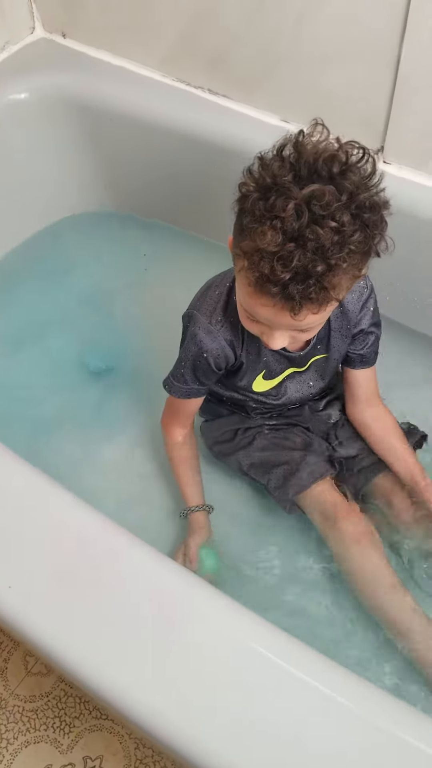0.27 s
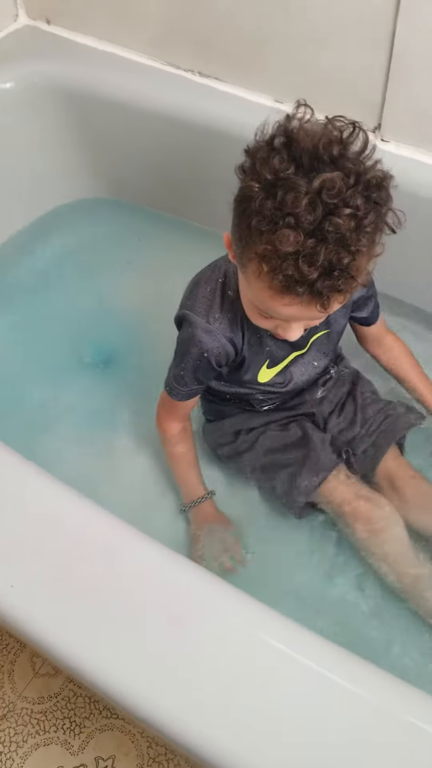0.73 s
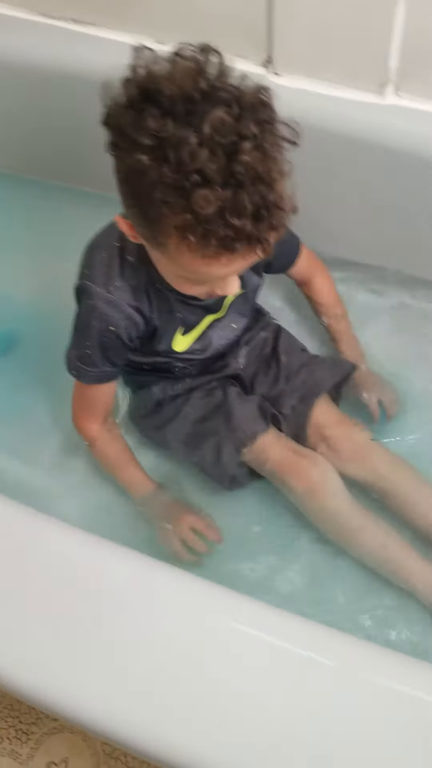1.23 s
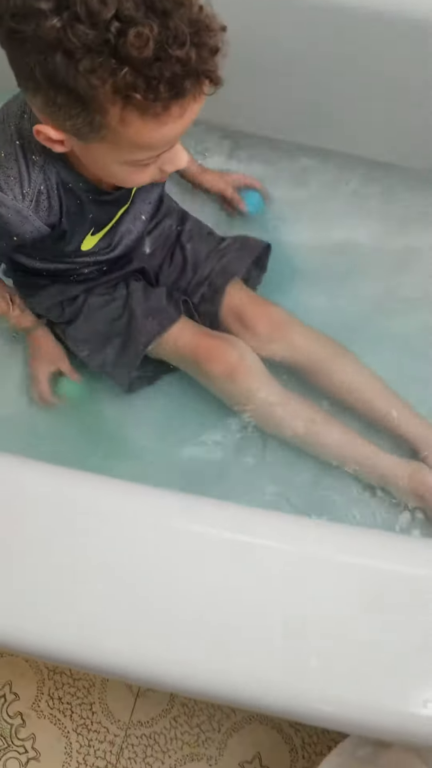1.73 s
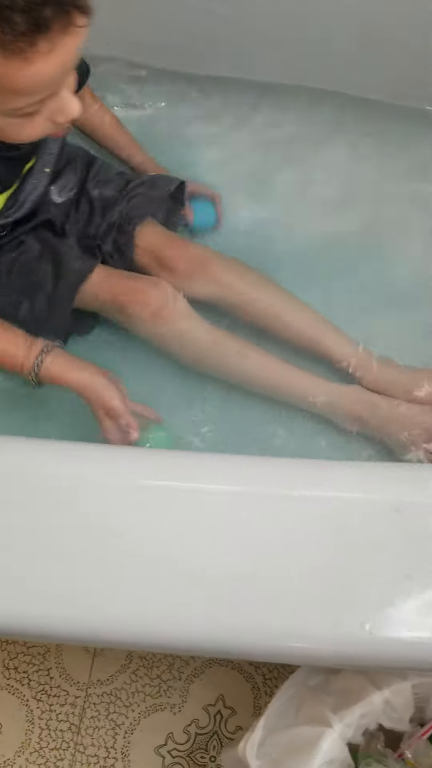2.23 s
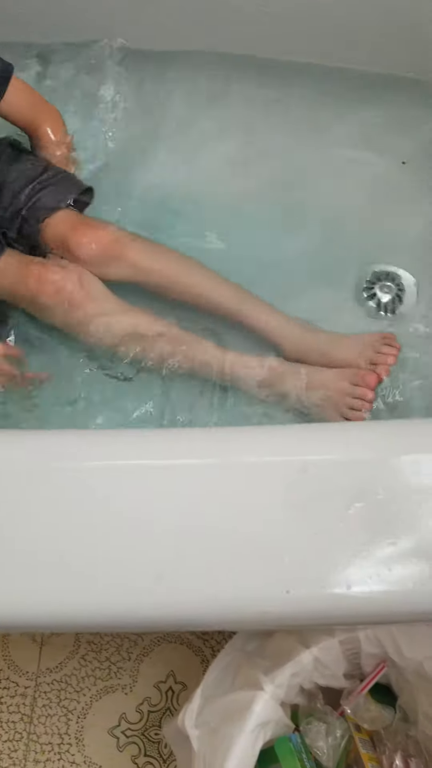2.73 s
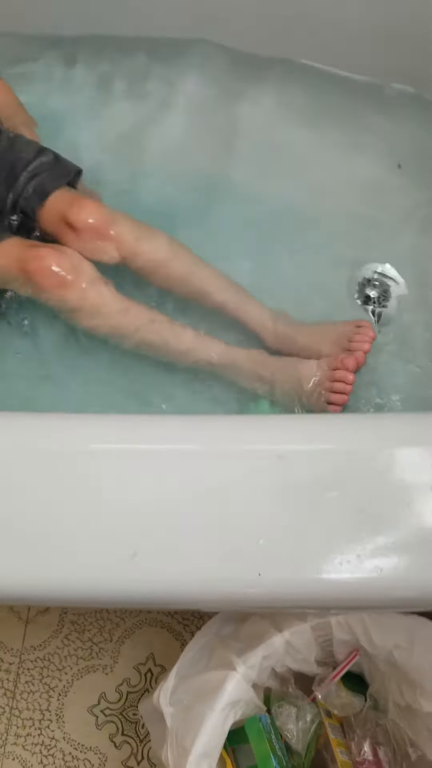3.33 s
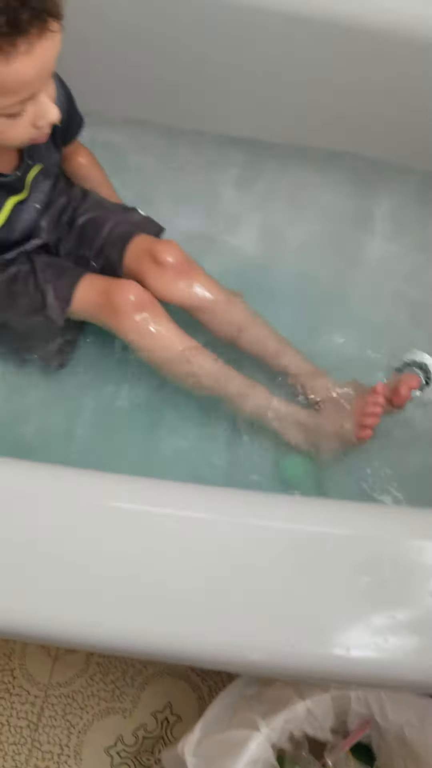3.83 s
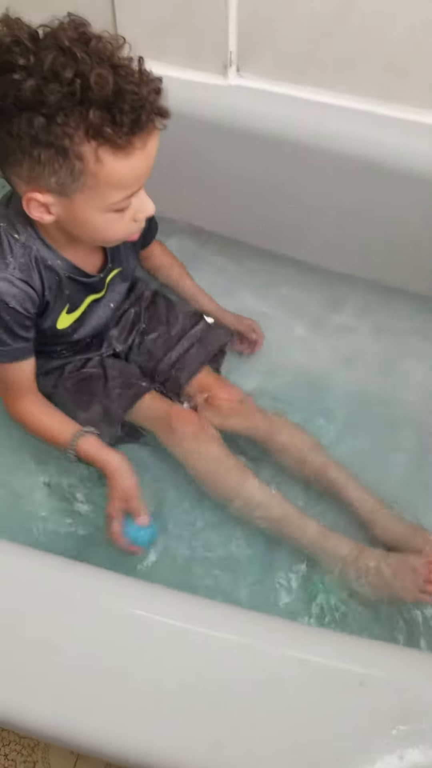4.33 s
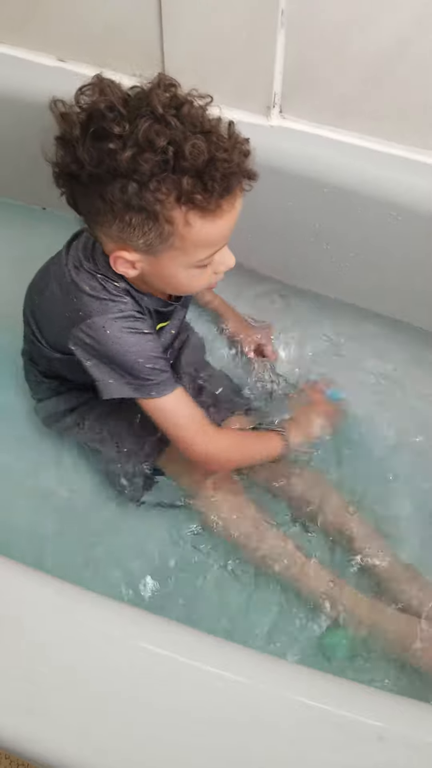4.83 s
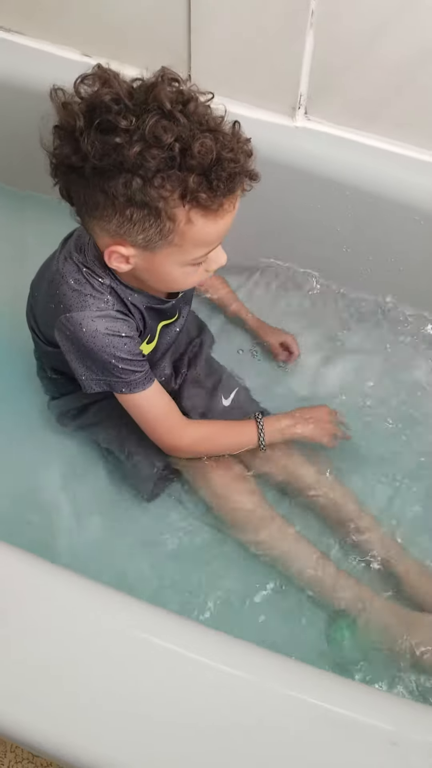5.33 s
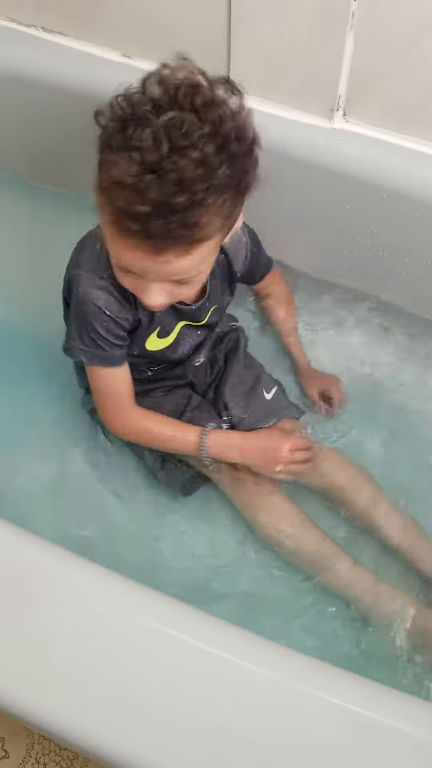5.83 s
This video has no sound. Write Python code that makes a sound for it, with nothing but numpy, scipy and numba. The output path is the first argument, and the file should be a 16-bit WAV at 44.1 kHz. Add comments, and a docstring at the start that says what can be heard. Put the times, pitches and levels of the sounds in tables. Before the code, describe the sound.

Bathwater laps softly throughout as a child moves hands and legs in the tub. It is heard from close above the rim, with a short echo from the tiled bathroom and a steady low household hum behind it. For the first 2 seconds there are light strokes and a few small bubbly plips, with a gentle slosh just before 1 second. From about 2.2 to 3 seconds a brisker stir sends drops slapping onto the surface with a bright spatter. Between 3 and 4 seconds the water calms to quiet lapping and an odd drip. The loudest part runs from about 4.2 to 5 seconds: a quick flurry of splashes and spray, with small bubbles churning between the slaps. This thins to trickling, and one last short splash comes at about 5.8 seconds before the water laps on briefly.

```python
"""Someone in a bathtub stirs the water with hands and legs; a phone is held above the rim.
Lapping and a low household hum run throughout; the tiled bathroom echoes the water.
0-2 s: light strokes, trapped bubbles ring for a few cycles. 2-3 s: a brisker stir, drops slap the surface.
3-4 s: lull. 4.2-5 s: loudest splashing, small bubbles churn between the slaps.
Then trickling, and a last splash at 5.8 s."""
import sys
import numpy as np
from scipy import signal
from scipy.fft import rfft, irfft, next_fast_len
from scipy.io import wavfile
from numba import njit

SR = 44100
rng = np.random.default_rng(int(sys.argv[2]) if len(sys.argv) > 2 else 0)


def unload_audio(sound):
    """Save the sound as a 16-bit wav file, at the path given as the first command line argument."""
    columns = np.transpose(np.atleast_2d(sound))
    # keep every value between -1 and 1, then stretch to whole-number steps
    steps = np.round(np.clip(columns, -1, 1) * 32767)
    wavfile.write(sys.argv[1], SR, steps.astype(np.int16))


N = 268657
SPOTS = 6  # places in the tub, each with its own echoes


def bubbles(rise_cycles=0.29, snap=0.76, max_glide=0.032):
    """Single bubbles pinch off, ring and creep up in pitch. Returns (room feed, direct feed)."""
    # (time [s], pitch [Hz], level [dB], decay to 1/e [cycles], direct path offset [dB])
    events = [(0.002, 3360, -38.5, 3.7, -7), (0.003, 4450, -35, 2.6, 2), (0.096, 3160, -46.5, 8, 4),
              (0.1511, 2930, -45, 6.9, 3), (0.731, 2780, -43.5, 3.4, 0), (0.7315, 850, -36.5, 2.8, 3.5),
              (0.8022, 690, -51, 5, 4), (0.8564, 424, -48, 3.1, -11), (0.87, 794, -32, 1, -2),
              (0.8705, 1520, -35, 1.2, 3), (0.872, 148, -43.5, 7.3, 4), (0.89, 219, -48, 3.1, 4),
              (0.9653, 6150, -44, 5.1, 0), (0.9675, 2300, -50, 2.6, 2), (0.9723, 550, -40.5, 4.1, -2),
              (1.02, 114, -42, 5.4, 4), (1.602, 5000, -47, 4, -1), (1.966, 4500, -48.5, 2.6, -6),
              (2.1657, 3100, -51.5, 6, 1), (2.1817, 5960, -49.5, 5.7, 7), (2.1835, 2450, -42, 3.4, 2),
              (2.2268, 2260, -43, 6.9, 4), (2.2275, 920, -43, 3.2, -11), (2.2295, 4450, -46, 7.9, 7),
              (2.235, 118, -40, 4.8, -3), (2.2521, 233, -40.5, 3.7, 2), (2.2553, 5300, -42, 6, 0),
              (2.2559, 490, -52.5, 3, 5), (2.2799, 2500, -47, 5.5, 1), (2.2873, 5820, -22.5, 6.9, -4.5),
              (2.313, 1225, -39.5, 11.6, 5), (2.3343, 1890, -39, 2.9, -3), (2.3823, 796, -47.5, 2.8, 3),
              (2.4315, 1970, -50.5, 4, 2), (2.4445, 2400, -51, 4.3, -1), (2.4672, 3000, -37, 3.2, 3),
              (2.4947, 3730, -31.5, 3.6, 2), (2.5017, 2260, -38, 3.8, 3.5), (2.587, 2180, -42.5, 4.1, 7.5),
              (2.6908, 1370, -35.5, 3.5, -2), (2.6897, 1291, -44, 16, -12), (2.803, 308, -51.5, 9.4, 3.5),
              (2.808, 618, -49.5, 9.9, -13), (2.839, 910, -53.5, 4.8, 0), (3.042, 3680, -36, 4.9, -3.5),
              (3.1256, 2460, -48.5, 5.9, -12), (3.4682, 4120, -50.5, 7.3, -4), (4.17, 1440, -52, 3.5, -7),
              (4.173, 5460, -54, 5, 4), (4.205, 1710, -44, 4.4, 0), (4.2294, 6560, -33.5, 5.7, -10),
              (4.2434, 3100, -31, 2.1, 2), (4.2542, 2210, -32, 2.4, 0.5), (4.2673, 735, -36, 5.5, 0),
              (4.288, 1600, -33.5, 10, -2), (4.2909, 2960, -33, 4, 1), (4.3148, 4300, -34.5, 3.7, -4),
              (4.3556, 1364, -37, 3.7, 0), (4.3608, 3500, -35.5, 3.6, 2), (4.3696, 740, -44, 6.8, -11),
              (4.3817, 1910, -40.5, 4, 6), (4.4165, 1130, -28, 2.9, -10), (4.4202, 4880, -28.5, 3.6, -3),
              (4.4368, 1587, -31.5, 7.8, 4), (4.4552, 5600, -27, 5.1, -2), (4.458, 3230, -26.5, 2.3, -2),
              (4.4678, 834, -44, 4.2, 5.5), (4.474, 2860, -19.5, 1.9, 1), (4.5005, 2000, -29, 9.5, 2),
              (4.506, 1890, -34, 6.3, 6.5), (4.518, 4800, -23, 3.1, -22), (4.5373, 930, -39.5, 2.7, -6),
              (4.5842, 1550, -39.5, 5, 2), (4.6006, 354, -49, 2.9, -5), (4.6017, 3760, -32, 4.3, 9.5),
              (4.6052, 687, -37.5, 4.1, -8), (4.608, 1650, -36, 4.6, 4), (4.627, 1760, -29, 10, 4),
              (4.638, 2020, -31, 4.2, 8), (4.644, 2250, -37.5, 6.6, 5), (4.6416, 518, -39, 3.6, -2),
              (4.664, 1066, -38, 4.8, 0), (4.678, 1220, -41, 2.4, -7), (4.7035, 3400, -26.5, 6.5, -1),
              (4.717, 588, -33.5, 2.7, 3), (4.74, 294, -48, 2.2, 4.5), (4.7428, 3820, -23, 2.9, 7),
              (4.7474, 1000, -29, 3.3, 0), (4.7505, 2300, -31.5, 2.8, 10), (4.7668, 255, -37.5, 3.8, 4),
              (4.7909, 860, -37.5, 7.5, 2), (4.7957, 3230, -34, 4.9, -3), (4.798, 1476, -30, 4.5, 1),
              (4.8073, 5160, -25, 3.7, -2), (4.8139, 740, -38.5, 3.4, 8.5), (4.816, 457, -43.5, 6.3, -5),
              (4.82, 1200, -34, 4.6, -13), (4.8231, 6260, -27, 3.4, -1), (4.8462, 2350, -35, 8.3, 6),
              (4.89, 365.4, -36.5, 3.1, 1.5), (4.8906, 834, -27.5, 3.1, -3), (4.9023, 2080, -34.5, 3.9, 2),
              (4.9407, 2240, -34.5, 5.5, 9), (4.9645, 5240, -33.5, 3.3, 9), (4.9928, 1560, -39, 3.1, 0),
              (5.0462, 2530, -43.5, 5.4, 1.5), (5.1399, 2720, -36, 2.8, 4.5), (5.176, 4980, -41, 5.3, -3),
              (5.3985, 5040, -47, 3.4, 3), (5.53, 5130, -47, 6.7, -6), (5.5545, 2210, -41.5, 2.7, 1),
              (5.5553, 4870, -53, 4.7, 2), (5.811, 2570, -41, 7.2, -6), (5.8158, 445, -49, 4.4, -9),
              (5.8315, 2060, -29, 2.5, 7.5), (5.8324, 7050, -32, 6.5, -2), (5.8566, 2900, -44, 7.1, 4),
              (5.9307, 1940, -45, 3.3, 5), (5.993, 1370, -50.5, 4, 0), (6.0618, 2530, -48.5, 7.4, 1.5)]
    time_s, hz, level_db, cycles, direct_db = np.transpose(events)
    u_spot, u_glide = rng.random((len(events), 2)).T
    return np.array([ring(u_spot * SPOTS, time_s * SR, hz, cycles, undb(db),
                          max_glide * u_glide, rise_cycles, snap)
                     for db in (level_db, level_db + direct_db)])


@njit
def ring(spot, start, hz, cycles, amp, glide, rise_cycles, snap):
    """Damped sines summed per spot. Relative pitch lift: snap at pinch-off, glide per decay time."""
    out = np.zeros((SPOTS, N))
    for e in range(len(start)):
        step_rad = 2 * np.pi * hz[e] / SR
        tau_samples = cycles[e] * SR / hz[e]
        fade, onset_fade = np.exp(-1 / tau_samples), np.exp(-hz[e] / (SR * rise_cycles))
        gain, onset, phase = amp[e], 1., 0.
        for i in range(min(int(6 * tau_samples), N - int(start[e]))):
            out[int(spot[e]), int(start[e]) + i] += gain * (1 - onset) * np.sin(phase)
            phase += min(step_rad * (1 + glide[e] * i / tau_samples + snap * onset), 3.)
            gain *= fade
            onset *= onset_fade
    return out


def slaps(body_s=0.0082, spatter_s=0.01, rise_s=0.0012, spatter_db=12.5, body_db=-1.0, length=4096):
    """Drops and water sheets hit the surface: noise bursts, bright spatter plus a duller body."""
    # (time [s], level [dB], body offset [dB])
    hits = [(0.0014, -50.5, 6.5), (0.676, -66, 15), (0.7298, -68.5, 23.5), (0.799, -66, 26.5),
            (0.868, -69.5, 33.5), (0.963, -66, 23), (1.0006, -59.5, -3), (1.46, -64, -13),
            (2.1625, -70, 20), (2.197, -57, -10), (2.2256, -48, 15.5), (2.2856, -54, 13),
            (2.421, -50.5, -7), (2.474, -40.5, -18), (2.576, -55.5, -5), (2.6189, -67, 3), (2.696, -65, 14),
            (3.041, -57.5, -8), (4.001, -64, -9), (4.033, -61, -20), (4.08, -64, -15), (4.2028, -65, 14),
            (4.28, -47, 17.5), (4.3294, -44.5, -2), (4.359, -44, 14), (4.417, -38, -9), (4.598, -32.5, 9),
            (4.7026, -51, 29), (4.8142, -39.5, 2), (4.8347, -41, 17), (4.938, -52.5, 23),
            (4.9632, -39.5, 12.5), (5.1386, -57, 15.5), (5.2105, -53, -11), (5.448, -58, -11),
            (5.5129, -60, -8), (5.5504, -42, -15), (5.811, -56, 13), (5.8314, -39.5, 8),
            (6.002, -54.5, -22)]
    out, t = np.zeros((SPOTS, N + length)), np.arange(length) / SR
    highpass = signal.butter(2, 6000, "high", fs=SR, output="sos")
    bandpass = signal.butter(1, [300, 5000], "band", fs=SR, output="sos")
    for e, (time_s, db, dull_db) in enumerate(hits):
        noise = rng.standard_normal((2, length))
        spatter = signal.sosfilt(highpass, noise[0] * np.exp(-t / spatter_s) * (1 - np.exp(-t / rise_s)))
        body = signal.sosfilt(bandpass, noise[1] * np.exp(-t / body_s))
        slap = undb(spatter_db) * spatter + undb(dull_db + body_db) * body
        start = int(time_s * SR)
        out[e % SPOTS, start:start + length] += undb(db) / 2 * slap
    return out[:, :N]


def churn():
    """Large bubbles, small bubbles and fine spray, each following the stirring."""
    large, small, spray, small_hz = stirring()
    out = large * swarm(1500, np.full(N, 550.), span_oct=2.617, cycles=3.8, scatter_db=2.5)
    out += small * swarm(8000, small_hz, span_oct=1.36, cycles=1.35, scatter_db=6.0)
    return out + spray * swarm(30000, np.full(N, 12000.), span_oct=1.68, cycles=0.59, scatter_db=6.5)


def swarm(count, centre_hz, span_oct, cycles, scatter_db):
    """Bubbles at random times and spots, spread around a pitch."""
    u_time, u_pitch, u_size, u_ring, u_spot = rng.random((count, 5)).T
    start = u_time * (N - 1)
    hz = np.minimum(centre_hz[start.astype(int)] * 2 ** (span_oct * (u_pitch - .5)), 17000)
    amp = undb(scatter_db * np.minimum(-np.log(1 - u_size), 3))  # capped so no single bubble ticks out
    rings = ring(u_spot * SPOTS, start, hz, cycles * (.5 + u_ring), amp,
                 glide=0.029 * u_ring, rise_cycles=0.65, snap=0.)
    return unit(rings) / np.sqrt(SPOTS)


def stirring(lapping_hz=2300.):
    """Hand and leg pushes surge over steady lapping. Returns three swarm gains and the small-bubble Hz."""
    # (time [s], hold [s], large bubbles [dB], small bubbles [dB], small-bubble pitch [Hz], spray [dB])
    surges = [(0.288, 0.14, -79, -68, 2520, -71), (0.73, 0.01, -66.5, -70, 2670, -77),
              (0.874, 0.01, -56.5, -64, 1830, -78), (0.98, 0.01, -57.5, -65, 2080, -69),
              (1.32, 0.0092, -71, -76, 3970, -70), (1.513, 0.17, -88, -85.5, 4500, -70.5),
              (1.968, .02, -74, -79, 3200, -72), (2.24, 0.029, -59, -73, 4000, -56.5),
              (2.34, .01, -80, -75, 5800, -61), (2.481, 0.01, -75, -62, 3640, -53),
              (2.585, 0.033, -84, -73, 2300, -74), (2.796, 0.025, -66, -76, 1720, -77),
              (3.103, 0.01, -84, -65, 4050, -66.5), (3.47, 0.03, -82, -83, 4000, -76),
              (4.102, .01, -71, -86, 3400, -63), (4.237, 0.011, -72.5, -70.5, 2880, -56.5),
              (4.31, .02, -82, -58, 1630, -51), (4.459, 0.048, -72, -46, 2240, -43),
              (4.57, 0.008, -72, -51, 2840, -50), (4.688, 0.011, -73, -44, 1890, -53),
              (4.756, 0.0075, -50, -47.5, 3280, -45), (4.863, 0.06, -52.5, -75, 2300, -56),
              (5.035, .01, -63, -62, 2520, -60.5), (5.227, 0.11, -73, -75, 4770, -65.5),
              (5.557, .01, -65, -95, 3640, -59), (5.76, 0.15, -68, -73, 2150, -62),
              (6.073, .01, -61.5, -75, 2680, -63)]
    # (time [s], large bubbles [dB], small bubbles [dB], spray [dB])
    lapping = [(0, -73.5, -98, -71), (.6, -67.5, -88, -69), (1.05, -72, -91, -71), (1.2, -71.5, -94, -80),
               (1.4, -70.5, -86, -77), (2.1, -78, -86, -76), (2.7, -71, -81, -86), (2.95, -73.5, -99, -95),
               (3.25, -71.5, -85, -75), (3.6, -74.5, -93, -86), (3.95, -76, -88, -82), (4.3, -74, -84, -68),
               (5.1, -67, -89, -59), (5.5, -79.5, -91, -65.5), (6.09, -66, -81, -66)]
    rise_db_per_s, fall_db_per_s = [237, 271, 192], [160, 207, 108]  # large, small, spray
    t = np.arange(0, N / SR + .01, .002)
    time_s, hold_s, large_db, small_db, surge_hz, spray_db = np.transpose(surges)[..., None]
    before_s, after_s = np.maximum(time_s - t, 0), np.maximum(t - time_s - hold_s, 0)
    lapping_s, *lapping_db = np.transpose(lapping)
    surge_db, powers = (large_db, small_db, spray_db), []
    for db, rise, fall, calm_db in zip(surge_db, rise_db_per_s, fall_db_per_s, lapping_db):
        curves_db = np.vstack([db - rise * before_s - fall * after_s, np.interp(t, lapping_s, calm_db)])
        powers.append(undb(2 * curves_db))
    gains = [np.sqrt(power.sum(axis=0)) for power in powers]
    small_hz = np.append(surge_hz, lapping_hz) @ powers[1] / powers[1].sum(axis=0)  # power-weighted mean
    return [np.interp(np.arange(N) / SR, t, curve) for curve in gains + [small_hz]]


def bathroom(room_feed, direct_feed):
    """Each spot reaches the phone by its own echoes and direct path."""
    def hear(x, response):
        return signal.oaconvolve(x[None], response, axes=1)[:, :N]
    return sum(hear(room, echoes()) + hear(direct, direct_path())
               for room, direct in zip(room_feed, direct_feed))


def direct_path():
    """Straight path to both microphone ports, plus bounces off the tub side and nearest tiles."""
    # (mean delay [s], level [dB])
    walls = [(.0025, -7), (.0046, -11.5)]
    response = np.zeros((2, 512))
    right_lag_samples = int(14 * (0.63 + 1.01 * rng.random()))  # each spot lies at its own angle
    response[[0, 1], [0, right_lag_samples]] = 1
    for delay_s, db in walls:
        delay_samples = (delay_s * SR * (.8 + .4 * rng.random(2))).astype(int)
        response[[0, 1], delay_samples] = undb(db)
    return response


def echoes(length=28000, tiles_db=2.5, build_s=0.0036, tub_db=-3.5, tub_decay_s=0.011):
    """Impulse response of one spot: quick tub echoes, then the tiles, each octave at its own decay."""
    # (frequency [Hz], reverberation time [s])
    t60 = [(200, 0.24), (600, 0.45), (1500, 0.34), (4000, 0.3), (8000, 0.18), (14000, 0.19)]
    t, noise, tiles = np.arange(length) / SR, diffuse(length), 0
    for centre_hz in 125 * 2. ** np.arange(8):
        def octave(hz):
            return np.cos(np.pi / 2 * np.clip(np.log2(np.maximum(hz, 1) / centre_hz), -1, 1)) ** 2
        tiles = tiles + shape(noise, octave) * undb(-60 * t / at(t60, centre_hz))
    tiles *= 1 - np.exp(-t / build_s)
    tub = diffuse(length) * np.exp(-t / tub_decay_s) * (t > .001)
    return (undb(tiles_db) * unit(tiles) + undb(tub_db) * unit(tub)) / np.sqrt(length)


def hum(level_db=-52):
    """Distant machinery through the walls, lifted at the lowest room modes."""
    # (frequency [Hz], relative density [dB])
    spectrum = [(25, -14), (45, -6), (75, -2.5), (150, -17), (260, -44), (620, -22.5), (800, -26),
                (1100, -49.5), (1500, -26.5), (2300, -39), (3400, -46), (5000, -36.5), (9000, -39.5),
                (16000, -29)]
    # (frequency [Hz], width [Hz], relative peak [dB])
    room_modes = [(73, 19, -3.5), (121, 10.4, 5), (150.3, 26.6, -0.5), (210.3, 38, -6)]

    def gain(hz):
        mode_power = sum(undb(2 * db) / (1 + (2 * (hz - mode_hz) / width_hz) ** 2)
                         for mode_hz, width_hz, db in room_modes)
        return np.sqrt(undb(2 * at(spectrum, hz)) + mode_power)
    return undb(level_db) * unit(shape(diffuse(N), gain))


def diffuse(length):
    """Diffuse-field stereo noise: alike in the bass, unrelated in the treble."""
    # (frequency [Hz], left-right coherence [0-1])
    coherence = [(60, 0.89), (130, 0.95), (300, 0.77), (640, 0.48), (1400, 0)]
    mid, side = rng.standard_normal((2, length))
    mid = shape(mid, lambda hz: np.sqrt((1 + at(coherence, hz)) / 2))
    side = shape(side, lambda hz: np.sqrt((1 - at(coherence, hz)) / 2))
    return np.array([mid + side, mid - side])


def undb(db):
    return 10 ** (np.asarray(db) / 20)


def unit(x):
    """Scale to rms 1."""
    return x / np.sqrt(np.mean(x ** 2))


def at(table, hz):
    """Interpolate (Hz, value) rows on a log-frequency axis."""
    row_hz, values = np.transpose(table)
    return np.interp(np.log(np.maximum(hz, 1)), np.log(row_hz), values)


def shape(x, gain):
    """Multiply the spectrum by gain(hz)."""
    size = next_fast_len(x.shape[-1])
    hz = np.arange(size // 2 + 1) * SR / size
    return irfft(rfft(x, size) * gain(hz), size)[..., :x.shape[-1]]


def scene():
    """Water in the bathroom, over the hum."""
    room_feed, direct_feed = bubbles() + slaps() + churn()
    return bathroom(room_feed, direct_feed) + hum()


def record(dry, cutoff_hz=15900):
    """The phone's ports colour the treble and favour the left; the top is cut."""
    # (frequency [Hz], gain [dB])
    port_response = [(20, -2.5), (4500, 2), (6300, 0), (7200, -8.5), (8300, -17.5), (9700, -11.5),
                     (11500, -5), (13000, -4), (16000, -8.5)]
    # (frequency [Hz], left over right [dB])
    balance = [(100, 0), (400, 5.5), (900, 3), (2400, 5), (7000, 4), (14000, -1)]
    sides = np.array([[.5], [-.5]])
    ports = shape(dry, lambda hz: undb(at(port_response, hz) + sides * at(balance, hz)))
    return signal.sosfilt(signal.ellip(10, .2, 80, cutoff_hz, fs=SR, output="sos"), ports)


dry = scene()
out = record(dry)
unload_audio(out)
```